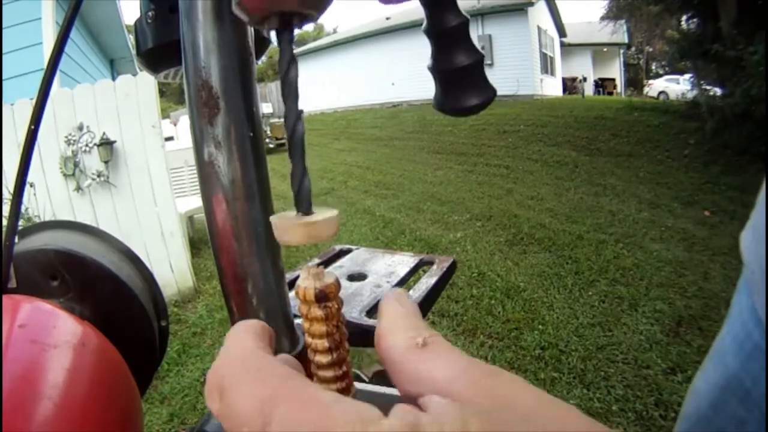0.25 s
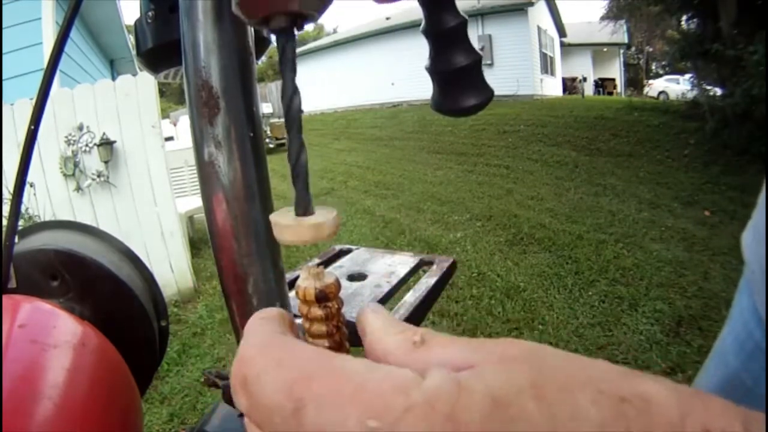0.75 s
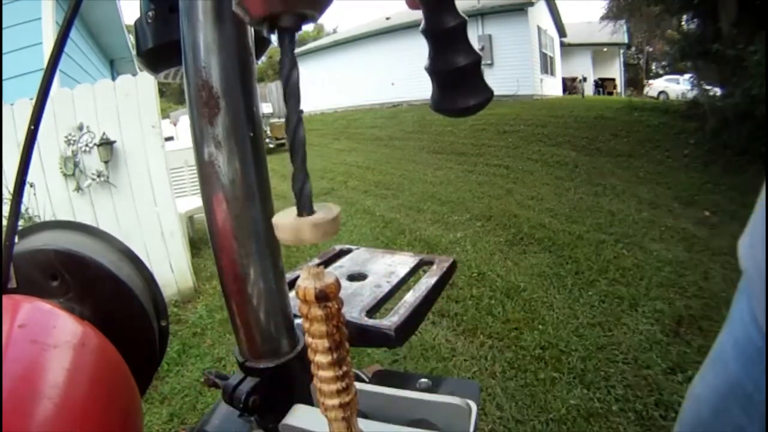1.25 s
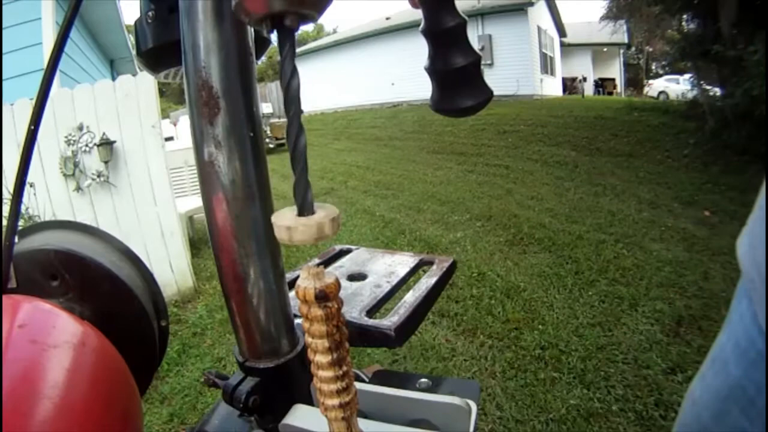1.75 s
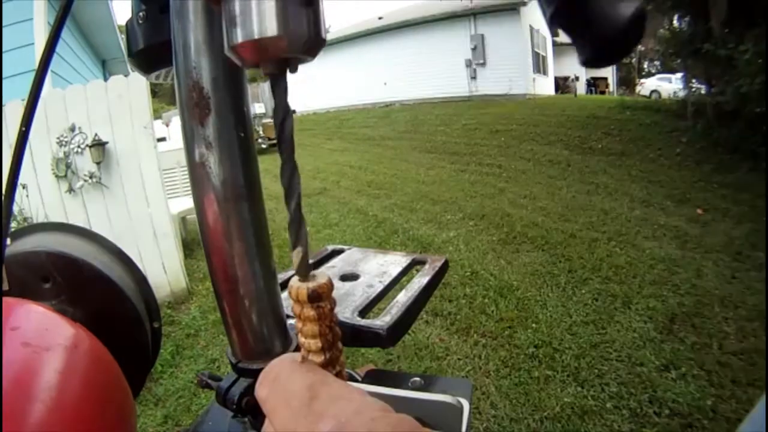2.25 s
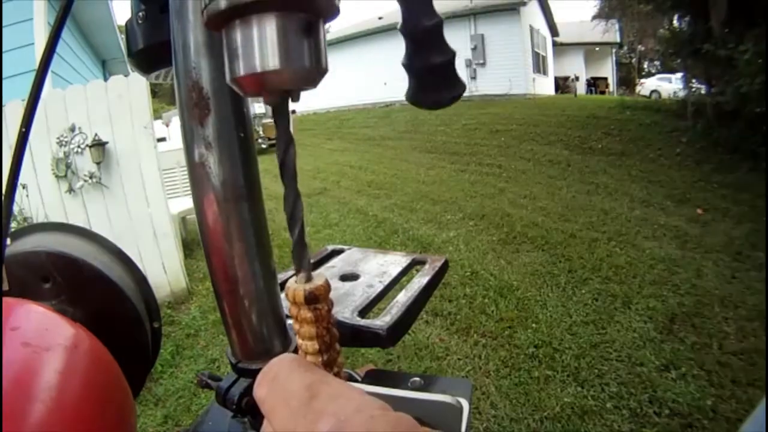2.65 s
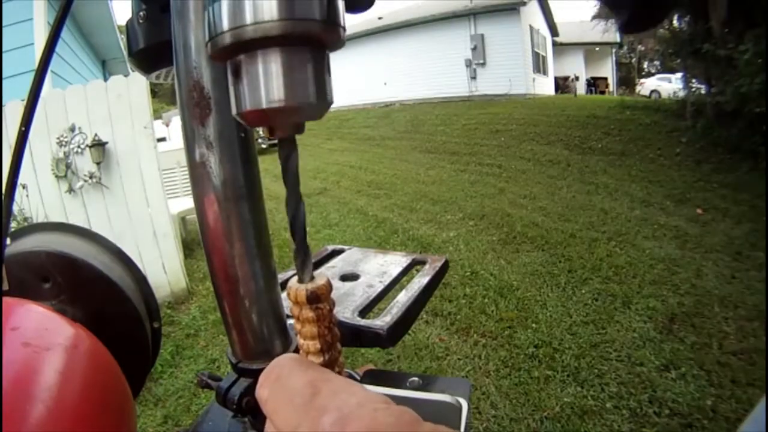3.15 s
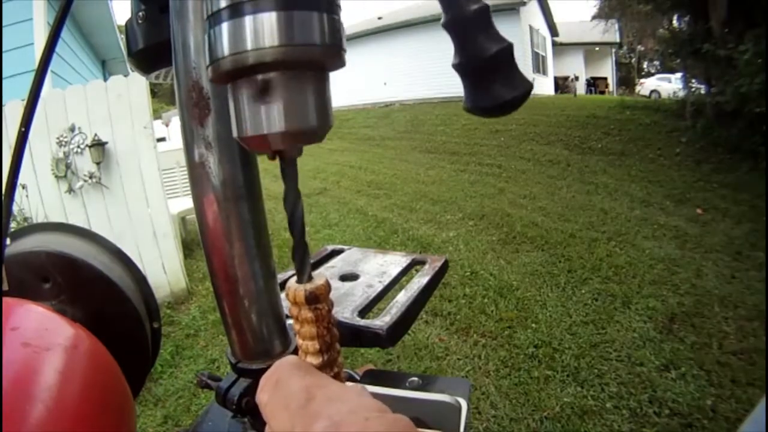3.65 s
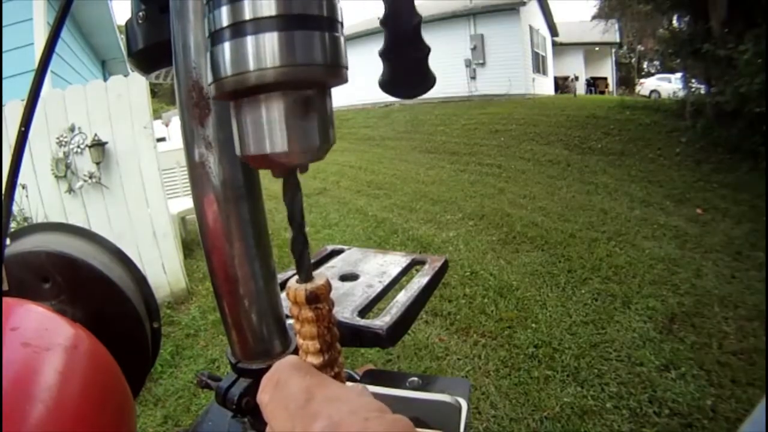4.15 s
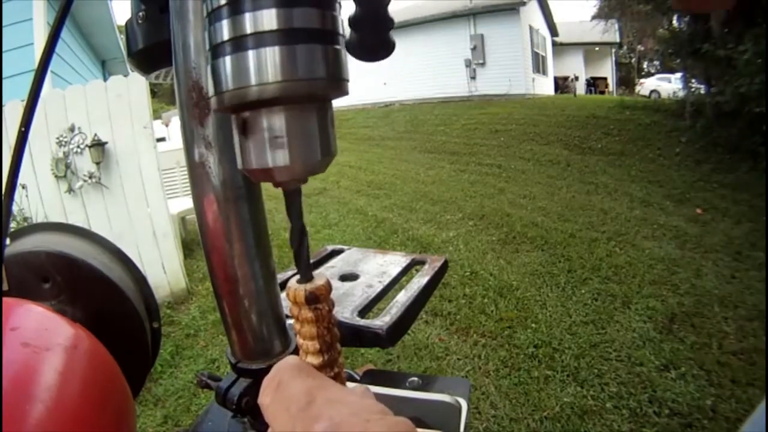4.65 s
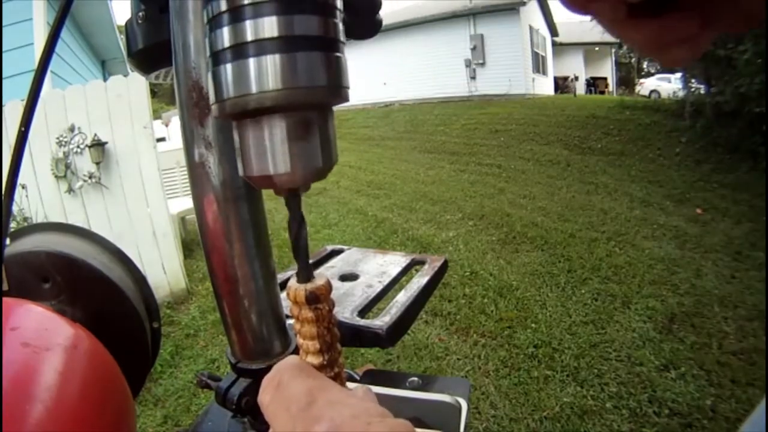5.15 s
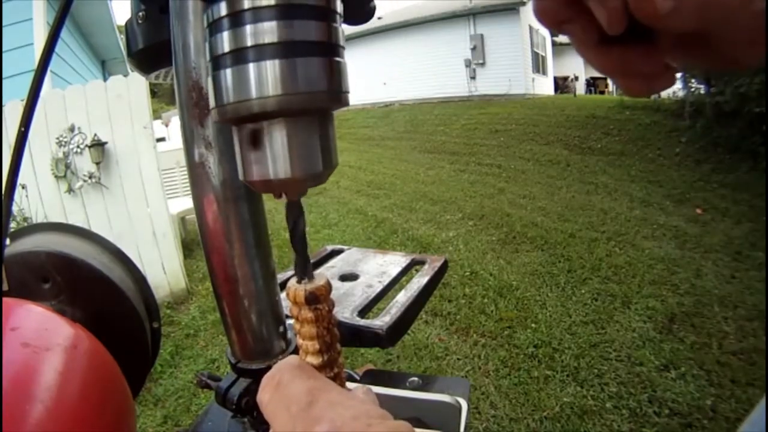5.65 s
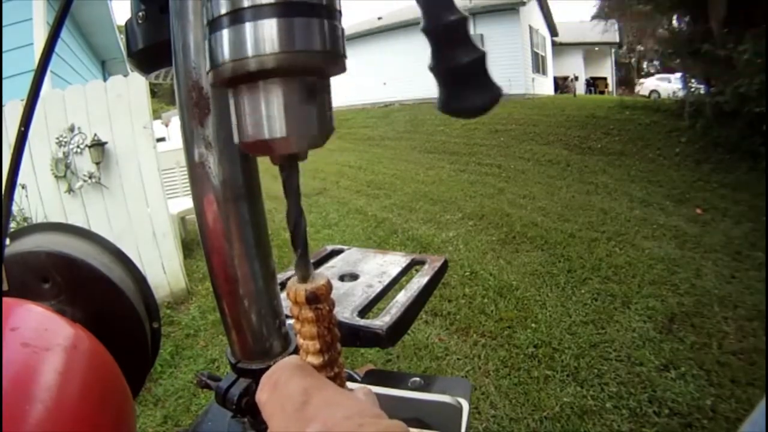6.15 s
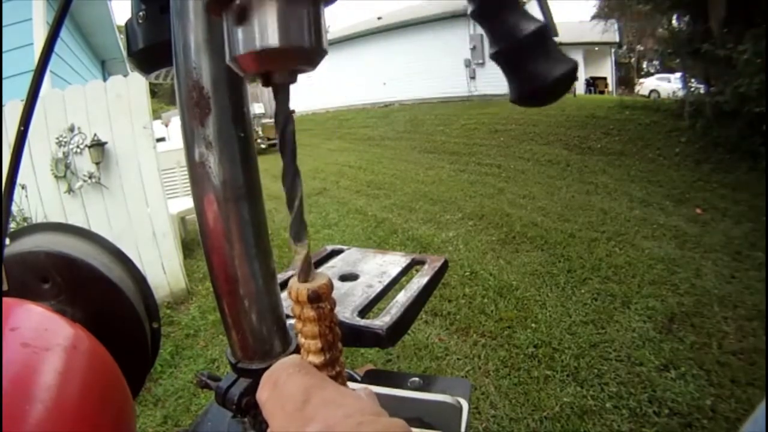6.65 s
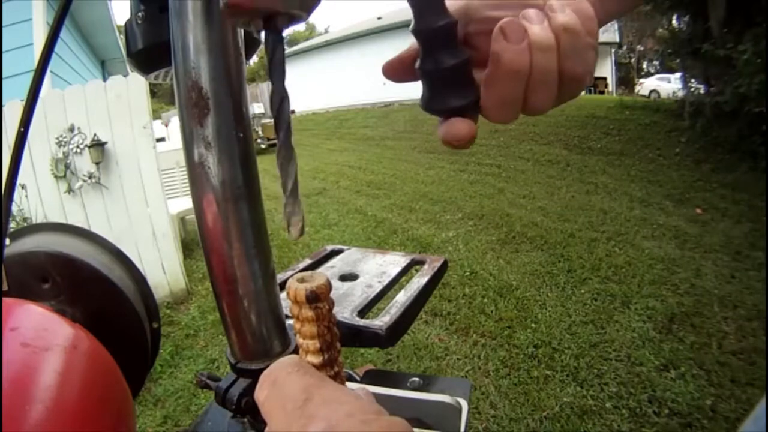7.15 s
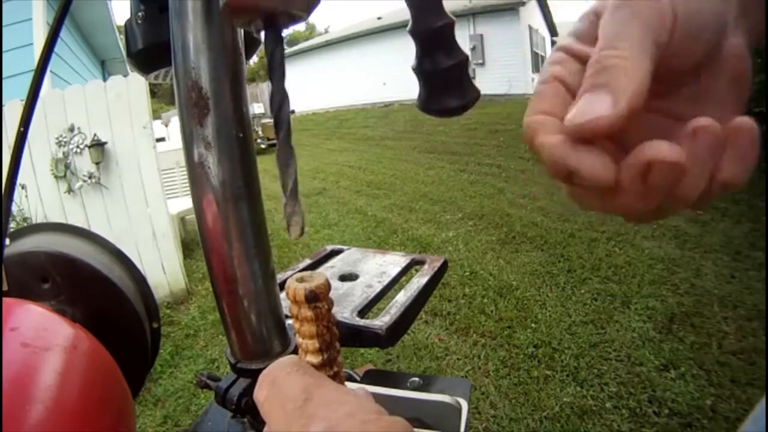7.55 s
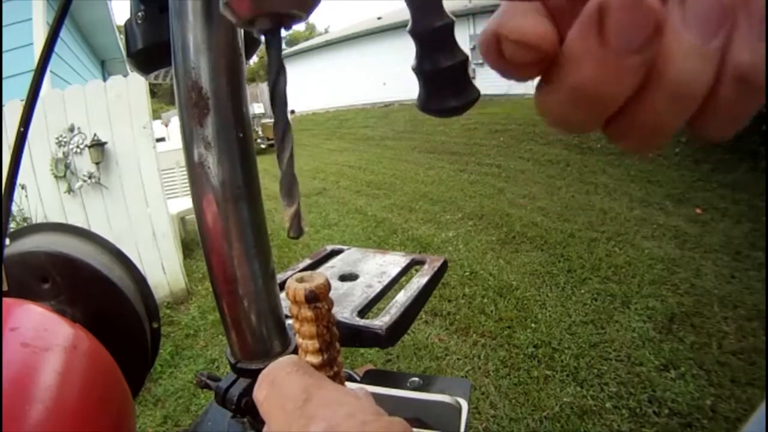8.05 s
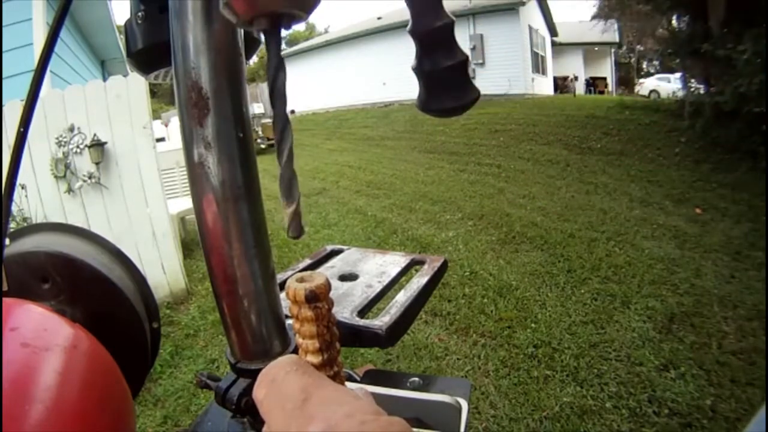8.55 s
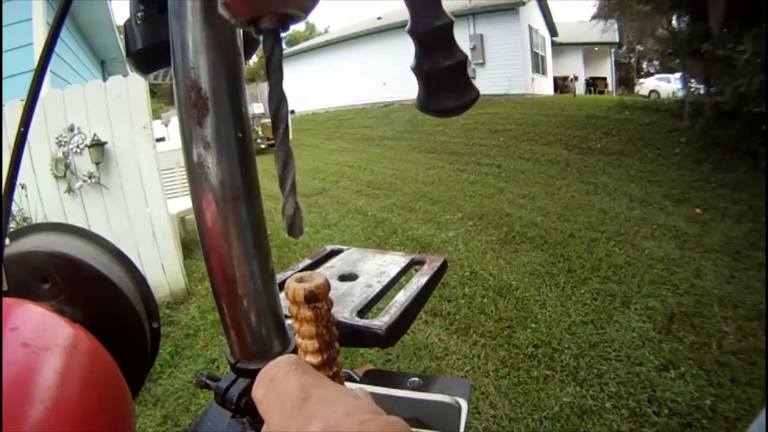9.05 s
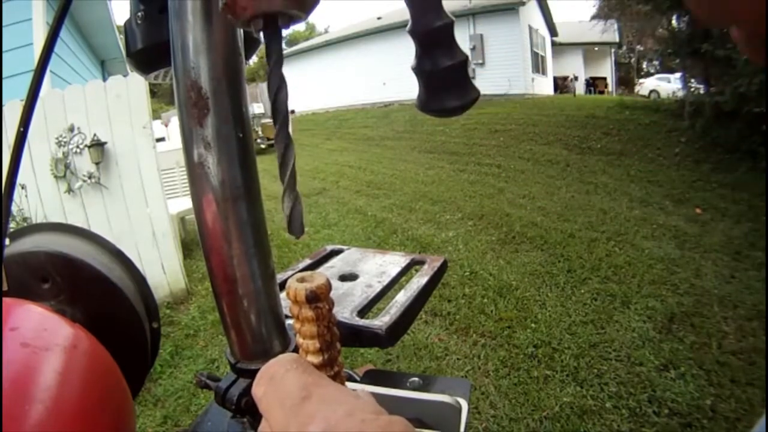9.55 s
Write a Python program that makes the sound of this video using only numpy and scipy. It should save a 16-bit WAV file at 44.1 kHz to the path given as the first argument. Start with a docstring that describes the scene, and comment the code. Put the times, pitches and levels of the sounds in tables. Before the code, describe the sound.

Close up on a lawn, a small belt-driven drill press throbs and hums with a rapid metallic rattle and a buzzing wooden disc. A switch clacks, it slows, and the sound drops out briefly. Running again, the bit scrapes into a wooden handle with a faint ringing whine and small knocks, pulls out, the rattle returns, then it clicks off and coasts down. Cheap camera microphone, gritty treble.

```python
"""A small belt-driven drill press rattles on a lawn, heard close up through a cheap 12 kHz camera.
It idles with a knocking quill, is switched off, then runs again: the bit is fed into a wooden handle,
drawn back, and the motor is switched off and coasts down with a few last knocks.
Filtered noise makes the stand, bearings and cutting; sines make the hum; short decaying bursts make
knocks, blows and scrapes. Quiet open air lies underneath."""
import sys
import numpy as np
from scipy import signal
from scipy.fft import rfft, irfft, next_fast_len
from scipy.io import wavfile
from scipy.ndimage import uniform_filter1d

SR = 44100
rng = np.random.default_rng(int(sys.argv[2]) if len(sys.argv) > 2 else 0)


def unload_audio(sound):
    """Save the sound as a 16-bit wav file, at the path given as the first command line argument."""
    columns = np.transpose(np.atleast_2d(sound))
    # keep every value between -1 and 1, then stretch to whole-number steps
    steps = np.round(np.clip(columns, -1, 1) * 32767)
    wavfile.write(sys.argv[1], SR, steps.astype(np.int16))


N = 431738
T = np.arange(N) / SR
SPLINE_HZ = 49.85  # splines passing per second at full speed, four to a turn


def undb(db):
    """Decibels to gain."""
    return 10 ** (np.asarray(db) / 20)


def unit(x):
    """Scale to rms 1."""
    return x / np.sqrt(np.mean(x ** 2))


def curves(table):
    """The columns of a table, joined by straight lines in time."""
    s, *columns = np.transpose(table)
    return [np.interp(T, s, column) for column in columns]


def add(out, s, sound):
    """Mix a short sound in at time s."""
    i = max(int(s * SR), 0)
    out[i:i + len(sound)] += sound[:N - i]


def walk(rate_hz):
    """Smooth random wandering of rms 1: random steps, averaged twice."""
    k = int(SR / rate_hz)
    steps = np.repeat(rng.standard_normal(N // k + 1), k)
    smooth = uniform_filter1d(uniform_filter1d(steps, k), k)
    return unit(smooth[:N])


def shaped(x, gain):
    """Filter x by a gain that is a function of frequency; rms 1."""
    size = next_fast_len(N)
    f = np.maximum(np.fft.rfftfreq(size, 1 / SR), 1)
    return unit(irfft(rfft(x, size) * gain(f), size)[:N])


def coloured(points):
    """Noise of rms 1 with a spectrum drawn through (pitch_hz, level_db) points."""
    hz, db = np.transpose(points)

    def gain(f):
        return undb(np.interp(np.log(f), np.log(hz), db, left=-99, right=-99))
    return shaped(rng.standard_normal(N), gain)


def resonant(modes):
    """Random shaking of steep resonances, each a bandpass applied twice; rms 1."""
    total = np.zeros(N)
    for hz, width, db in modes:
        def gain(f):
            return (1 + 1j * (f / hz - hz / f) * hz / width) ** -2
        total += undb(db) * shaped(rng.standard_normal(N), gain)
    return unit(total)


def steadied(x, span_s):
    """Even out the slow swells of a vibration."""
    return x / np.sqrt(uniform_filter1d(x ** 2, int(span_s * SR)) + 1e-6)


def tone(hz):
    """A sine of rms 1 on a pitch curve."""
    turns = np.cumsum(hz * np.ones(N)) / SR + rng.random()
    return np.sqrt(2) * np.sin(2 * np.pi * turns)


def burst(t, hz, width_hz):
    """A rough ring around one pitch: many close modes that interfere."""
    z = rng.standard_normal(len(t)) + 1j * rng.standard_normal(len(t))
    band = np.exp(-(np.fft.fftfreq(len(t), 1 / SR) / width_hz) ** 2)
    z = np.fft.ifft(np.fft.fft(z) * band)
    return (z / np.sqrt(np.mean(np.abs(z) ** 2)) * np.exp(2j * np.pi * hz * t)).real


# hand on the feed lever, pressing the bit on the wood: start_s, pressure (0-1)
FEED_PRESSURE = [(2.3, 0), (2.55, 0.7), (3.1, 0.8), (3.4, 0.8), (4.8, 1), (5.3, 0.73), (6.0, 0.74),
                 (6.55, 0.7), (6.75, 0.6)]


def pressure():
    """Feed pressure, which cannot be negative and is zero while the bit is in the air."""
    s, force = np.transpose(FEED_PRESSURE)
    return np.maximum(np.interp(T, s, force, left=0, right=0), 0)


# resonances of the stand: pitch_hz, width_hz (of each bandpass pass), level_db (relative)
COLUMN_MODES = [(38.2, 18, -16), (66.93, 13.2, -1)]
HEAD_MODES = [(114.2, 18.4, 1)]
BASE_MODES = [(33, 22, 4.5), (172.4, 71, -8), (225.4, 35.2, -2.5), (298, 45, -18)]
# belt orders that lie on the column's resonance and beat together: pitch_hz (full speed), level_db (relative)
BELT_ORDERS = [(61.8, -6.5), (66.6, -3.5), (69.1, -3.5), (72.3, -7.5)]
# sway of the column at full speed, calm as the bit comes out: start_s, level_db
SWAY_LEVEL = [(0, -30.5), (1.5, -33.5), (2.24, -34.5), (2.9, -29.5), (3.3, -28.5), (4.2, -35), (5.1, -30),
              (5.5, -27), (5.95, -31), (6.18, -28.5), (6.56, -26.5), (6.67, -42), (6.95, -41), (7.04, -29),
              (7.6, -33.5), (9.1, -34)]
# rumble of the base at full speed, strong as the bit bites: start_s, level_db
RUMBLE_LEVEL = [(0, -48), (1.5, -49.5), (2.3, -50), (2.9, -46), (3.4, -45.5), (4.2, -49.5), (5.1, -47.5),
                (5.7, -48.5), (6.2, -45), (6.8, -49.5), (7.3, -47.5), (9.1, -48)]


def stand(speed, drift=0.00597, head_db=-36.5, foot_db=-44.0,
          sway_fall_db=72, head_fall_db=33, foot_fall_db=22, base_fall_db=28):
    """The flapping belt shakes column, head and base; orders on the column's resonance make it throb."""
    slowing = 1 - speed
    orders = sum(undb(db) * tone(hz * speed * (1 + drift * walk(2.8))) for hz, db in BELT_ORDERS)
    sway_db, = curves(SWAY_LEVEL)
    shaking = steadied(resonant(COLUMN_MODES) + speed ** 6 * orders, 0.27)
    sway = shaking * undb(sway_db - sway_fall_db * slowing ** 2)
    head = steadied(resonant(HEAD_MODES), 0.2) * undb(head_db - head_fall_db * slowing)
    # the lowest resonance: the stand rocks on the ground
    foot = resonant(BASE_MODES[:1]) * undb(foot_db - foot_fall_db * slowing)
    rumble_db, = curves(RUMBLE_LEVEL)
    base = resonant(BASE_MODES[1:]) * undb(rumble_db - base_fall_db * slowing)
    return sway + head + foot + base


# current in the windings: start_s, current (0-1)
CURRENT = [(0, 1), (1.48, 1), (1.5, 0), (2.15, 0), (2.2, 1), (9.06, 1), (9.08, 0), (9.8, 0)]
# magnetic hum of the windings: pitch_hz (average), level_db (average)
HUM_TONES = [(120, -47), (240, -60), (600, -62), (720, -61.5), (893, -61.5), (1012, -60.5)]


def motor(waver_db=2.5, drift=0.001513):
    """Mains harmonics and rotor slot tones, there only while the current flows."""
    current, = curves(CURRENT)
    hum = np.zeros(N)
    for hz, db in HUM_TONES:
        level = undb(db + waver_db * walk(14))
        hum += level * tone(hz * (1 + drift * walk(10)))
    return current * hum


# running gear before trims and slowing: start_s, quill_rub_db, belt_cover_ring_db, belt_and_bearing_whirr_db
GEAR_LEVELS = [(0, -57.5, -46.5, -49), (1.4, -55.5, -46.5, -51.5), (2.24, -59, -48, -54.5),
               (2.5, -53, -46, -51), (3.4, -54.5, -48.5, -50.5), (4.85, -55, -46, -51.5),
               (5.13, -60, -52.5, -52), (6.05, -61.5, -50.5, -54.5), (6.57, -55.5, -51, -48.5),
               (7.0, -59, -53.5, -53), (9.07, -58, -50.5, -52)]
# the belt cover sings while the quill is fed down: start_s, pitch_hz (average), level_db (average)
COVER_SONG = [(2.2, 1068, -92), (2.3, 1064, -55), (3.0, 1058, -52.5), (3.8, 1059, -52), (4.6, 1055, -50),
              (4.85, 1042, -53), (5.0, 1050, -58), (5.3, 1046, -90)]
# spectra of bearing whirr and dry quill rub: pitch_hz, level_db (per Hz, relative)
WHIRR_SPECTRUM = [(250, -8.5), (330, -12.5), (420, 5), (470, -6.5), (570, 7), (710, 4.5), (790, -8),
                  (890, 5.5), (950, -4.5), (1280, 0.5), (1380, -7.5), (1500, -1), (1750, -3.5), (2300, -2)]
RUB_SPECTRUM = [(1500, -20), (1900, -25), (2250, 1), (2550, 0), (2880, -2), (3200, -17.5), (3850, -4.5),
                (4400, -16.5), (5200, -20.5), (6000, -13.5)]


def gear(speed, spline_turns, rub_trim_db=1.0, cover_trim_db=-4, pulse=0.16, grain_db=2.5, patchy_db=1.0,
         whirr_fall_db=30, rub_fall_db=18, cover_fall_db=42, slack=0.18):
    """Bearings whirr, the quill rubs in time with its splines, the belt cover rings and sings.

    Whirr, rub and ring fade with speed, the rub first."""
    slowing = 1 - speed
    rub_db, ring_db, whirr_db = curves(GEAR_LEVELS)
    sing_hz, sing_db = curves(COVER_SONG)
    beat = 1 + pulse * np.cos(2 * np.pi * spline_turns)
    whirr = coloured(WHIRR_SPECTRUM) * undb(whirr_db - whirr_fall_db * slowing + 2.17 * walk(40))
    roughness = undb(grain_db * walk(300) + patchy_db * walk(45))
    rub_loss_db = rub_fall_db * (1 - np.exp(-slowing / slack))
    rub = unit(coloured(RUB_SPECTRUM) * beat * roughness) * undb(rub_db + rub_trim_db - rub_loss_db)
    cover = resonant([(1076.6, 57, 0)]) * undb(ring_db + cover_trim_db - cover_fall_db * slowing)
    song = tone(sing_hz + 2 * walk(20)) * undb(sing_db + 2 * walk(45))
    return whirr + rub + cover + song


# one knock in the quill and its spring: pitch_hz (average), width_hz, level_db (relative), delay_s, decay_s
QUILL_MODES = [(4900, 900, -16, 0, 0.0035), (3670, 220, -18, 0, 0.0077), (2656, 360, -4.5, 0.0028, 0.0052),
               (2197, 160, -5, 0.00018, 0.0036), (1770, 210, -21, .0045, 0.00086),
               (1487, 77, -9, 0.0051, 0.016), (1302, 380, -10.5, 0.00034, 0.0093)]


def spring_knock(ping_hz=2950, ping_s=0.0031, rise_s=0.0012, low_hz=1480, sink_hz=420, sink_s=0.00635,
                 low_db=-7, low_s=0.0039, echo_s=0.018, echo_db=-16):
    """A knock pings the sleeve, then scatters down the coiled spring and sinks into a low ring."""
    t = np.arange(2560) / SR
    detune = 1 + .015 * rng.standard_normal()
    ping = np.sin(2 * np.pi * (ping_hz * detune * t + rng.random()))
    knock = ping * (1 - np.exp(-t / rise_s)) * np.exp(-(t / ping_s) ** 2)
    for hz, width, db, delay, decay in QUILL_MODES:
        age = np.maximum(t - delay, 0)
        envelope = (1 - np.exp(-age / rise_s)) * np.exp(-age / decay)
        knock = knock + undb(db) * burst(t, hz * detune, width) * envelope
    # slow waves near the spring's cut-off come in after the ping
    age = np.maximum(t - ping_s, 0)
    turns = np.cumsum(detune * (low_hz + sink_hz * np.exp(-age / sink_s))) / SR + rng.random()
    envelope = (1 - np.exp(-age / rise_s)) * np.exp(-age / low_s)
    knock = knock + undb(low_db) * np.sin(2 * np.pi * turns) * envelope
    # the wave comes back once from the far end of the spring
    echo = np.interp(t - echo_s, t, knock, left=0)
    return 2 * (knock + undb(echo_db) * echo)


# stray knocks of the quill as it coasts or the load changes: start_s, level_db (relative)
STRAY_KNOCKS = [(1.512, -41.5), (1.536, -38), (1.649, -38.5), (1.8, -41), (2.279, -44), (2.328, -46),
                (2.363, -43), (2.685, -41.5), (2.888, -43), (2.927, -41), (3.084, -45), (6.801, -45),
                (6.883, -38), (7.07, -37), (7.16, -37), (9.089, -45), (9.113, -39), (9.224, -41.5),
                (9.372, -45)]
# idling with no load: start_s, end_s, hard_knock_db (average, relative)
IDLE_SPANS = [(0.025, 1.46, -37), (7.182, 9.04, -37.5)]
# one row per idle, chance of a hard knock: spline_1, spline_2, spline_3, spline_4 (each 0-1)
SPLINE_WEAR = [(.06, .62, .78, 1), (1, 0, .1, .12)]


def rattle(speed, spline_turns, uneven_db=1.4, tap_db=6, scatter_db=3, take_up_db=12, tap_fall_db=70, count=24):
    """With no load worn splines knock in their play, some on nearly every turn; the others tap lightly."""
    out = np.zeros(N)
    for s, db in STRAY_KNOCKS:
        add(out, s, undb(db) * spring_knock())
    taps = [spring_knock() for _ in range(count)]
    # pressure on the bit takes up the play
    taps_db = curves(GEAR_LEVELS)[0] + tap_db - take_up_db * pressure() ** 2 - tap_fall_db * (1 - speed)
    for i in np.flatnonzero(np.diff(np.floor(spline_turns))):
        spline = round(spline_turns[i])
        luck, size = rng.random(), rng.standard_normal()
        db = taps_db[i] + scatter_db * size
        for (start, end, hard_db), chances in zip(IDLE_SPANS, SPLINE_WEAR):
            idling = start - .5 / SPLINE_HZ < T[i] < end
            if idling and luck < chances[spline % len(chances)]:
                db = hard_db + uneven_db * size
        add(out, T[i], undb(db) * taps[rng.integers(count)])
    return out


def loose_disc(buzz_db=-54):
    """A wooden disc on the bit buzzes as it spins in the first run, then leaves only a faint trace."""
    spin, = curves([(0, 1), (.7, 1), (1.45, 1), (1.6, 0.7), (1.9, 0.031)])
    buzz = resonant([(1250, 76, 14), (1297, 130, -19), (2200, 250, -16)])
    return spin * undb(buzz_db + 3.6 * walk(49.74)) * buzz


# blows from the switch, the feed lever and the work: start_s, level_db (relative), brightest_hz, length_s
FRAME_BLOWS = [(1.479, -23.5, 2200, 0.0017), (2.844, -40, 2800, 0.00086), (2.934, -42, 3100, .005),
               (3.177, -32, 1164, 0.004), (3.216, -38, 950, 0.0035), (3.374, -43, 2560, 0.02),
               (5.191, -39.5, 770, 0.0042), (5.357, -41.5, 860, 0.0039), (6.071, -35.5, 920, 0.0028),
               (6.191, -39.5, 755, 0.0049), (6.331, -38, 1920, 0.0072), (6.512, -42, 3860, 0.006),
               (6.76, -36, 1800, 0.0032), (7.007, -42, 2090, 0.005), (7.118, -35.5, 766, 0.018),
               (8.262, -42, 2220, 0.0052), (8.732, -37, 850, 0.009), (9.064, -32.5, 2200, 0.0026),
               (9.186, -38.5, 1700, 0.00084), (9.395, -42, 1730, .005), (9.421, -34, 1654, 0.0018)]
# modes of the frame: pitch_hz, level_db (relative), t60_s
FRAME_MODES = [(227, -7, 0.071), (550, 2, 0.024), (717, -2, 0.11), (882, -2, 0.082), (1095, 0.5, .05),
               (1310, -3, 0.019), (1475, -1.5, 0.038), (1727, -5, 0.06), (1830, -6.5, 0.01),
               (2103, -2.5, 0.023), (2370, -35.5, .025), (2775, 2.5, 0.025), (3370, -8, 0.03),
               (3740, -0.5, 0.031), (4300, -3, 0.027), (4770, -10, 0.065), (5300, -3, 0.043),
               (5850, 0, 0.038)]


def blows(crack_db=-12, focus_db=5, bounce=0.13, ring_db=-6.5, part_db=-1.5, part_width_hz=110,
          part_s=0.0048, soft_s=0.0049):
    """Each blow is a push and a chatter of contacts that ring the frame.

    The shorter it is, the more the struck part also rings at its own pitch."""
    out, t = np.zeros(N), np.arange(4096) / SR
    for s, db, bright_hz, length in FRAME_BLOWS:
        contact = bounce * rng.standard_normal(len(t)) * np.exp(-t / length) + (t == 0)
        ring = np.zeros(len(t))
        for hz, mode_db, t60 in FRAME_MODES:
            level = undb(mode_db - focus_db * np.log2(hz / bright_hz) ** 2 - 60 * t / t60)
            ring += level * np.sin(2 * np.pi * (hz * t + rng.random()))
        body = signal.fftconvolve(contact, ring * (1 - np.exp(-t / 0.00034)))[:len(t)]
        crack = burst(t, 1.4 * bright_hz, bright_hz) * np.exp(-t / length)
        part = burst(t, bright_hz, part_width_hz) * (1 - np.exp(-t / 0.00058)) * np.exp(-t / part_s)
        # body and part are levelled over their first 10 ms
        blow = undb(ring_db) * body / body[:441].std()
        blow += undb(part_db) * np.exp(-length / soft_s) * part / part[:441].std()
        blow += 2 * undb(crack_db) * crack
        add(out, s, undb(db) * blow)
    return out


# spectrum of the scraped wood: pitch_hz, level_db (per Hz, relative)
CUT_SPECTRUM = [(3000, -29), (3900, -6), (4600, -5), (5250, 8), (5700, -4.5), (6000, 2.5)]
# squeaks of the bit in the hole: start_s, pitch_hz, level_db (relative), length_s
BIT_SQUEAKS = [(3.162, 5810, -34.5, 0.013), (3.767, 5700, -57, .012), (4.545, 5750, -60, 0.014),
               (5.127, 5700, -59, 0.013), (5.208, 5850, -53, 0.013), (5.346, 5180, -55.5, .012),
               (5.37, 5700, -54, .014)]


def drilling(spline_turns, cut_db=-62, grain_db=3, lips=0.037):
    """The two lips of the bit scrape the wood; now and then its flank sticks and squeaks."""
    two_per_turn = 1 + lips * np.cos(np.pi * spline_turns)
    scrape = coloured(CUT_SPECTRUM) * undb(grain_db * walk(150)) * two_per_turn
    out = unit(scrape) * pressure() * undb(cut_db)
    for s, hz, db, length in BIT_SQUEAKS:
        u = np.linspace(0, 1, int(length * SR))
        swell = np.sin(np.pi * u ** 0.51) ** 2
        add(out, s, undb(db) * 2 * swell * np.sin(2 * np.pi * hz * length * u))
    return out


# the bit brushes the rim of the hole: start_s, end_s
RIM_SPANS = [(2.439, 2.8), (6.449, 7.1)]


def chatter(count=45, grain_db=-47, spread_db=6.0, decay_s=0.0027):
    """While the bit enters and leaves the hole it skips against the rim in small dry scrapes."""
    out, t = np.zeros(N), np.arange(1024) / SR
    for start, end in RIM_SPANS:
        times = rng.uniform(start, end, count)
        pitches = rng.uniform(2160, 3010, count)
        sizes = rng.standard_normal(count)
        for s, hz, size in zip(times, pitches, sizes):
            scrape = burst(t, hz, 580) * (1 - np.exp(-t / 0.0026)) * np.exp(-t / decay_s)
            add(out, s, 2 * undb(grain_db + spread_db * size) * scrape)
    return out


# running speed of the motor: start_s, speed (0-1 of full speed)
MOTOR_SPEED = [(0, 1), (1.48, 1), (2.14, .4), (2.2, 1), (9.07, 1), (9.79, .35)]
# spectrum of the open air: pitch_hz, level_db (per Hz, relative)
AIR_SPECTRUM = [(25, 0.5), (100, -10), (250, -21), (500, -27.5), (1500, -36), (3000, -38.5), (5000, -40),
                (6000, -51.5)]


def scene():
    """The whole machine over quiet open air."""
    speed, = curves(MOTOR_SPEED)
    turns = np.cumsum(SPLINE_HZ * speed) / SR
    # in each run the splines are counted from the start of its idling
    first, second = (np.interp(idle[0], T, turns) for idle in IDLE_SPANS)
    spline_turns = turns - np.where(T < 2.17, first, second)
    machine = stand(speed) + motor() + gear(speed, spline_turns) + rattle(speed, spline_turns) + blows()
    work = loose_disc() + chatter() + drilling(spline_turns)
    air = undb(-51) * coloured(AIR_SPECTRUM)
    return (machine + work + air)[None]


# the sound cuts out briefly between the two runs: start_s, open (0-1)
BRIEF_GAP = [(2.132, 1), (2.137, 0), (2.218, 0), (2.236, 1)]
CAMERA_SR, TOP_HZ = 12000, 15100  # sample rate and treble limit, Hz


def record(dry):
    """The camera holds each 12 kHz sample, which mirrors the sound into a gritty treble."""
    sampled = signal.resample_poly(dry * curves(BRIEF_GAP)[0], CAMERA_SR, SR, axis=-1)
    steps = np.repeat(sampled, 8, axis=-1)
    held = signal.resample_poly(steps, SR, 8 * CAMERA_SR, axis=-1)[:, :N]
    lowpass = signal.ellip(8, .2, 70, TOP_HZ, fs=SR, output="sos")
    return signal.sosfilt(lowpass, held)


dry = scene()
out = record(dry)
unload_audio(out)
```